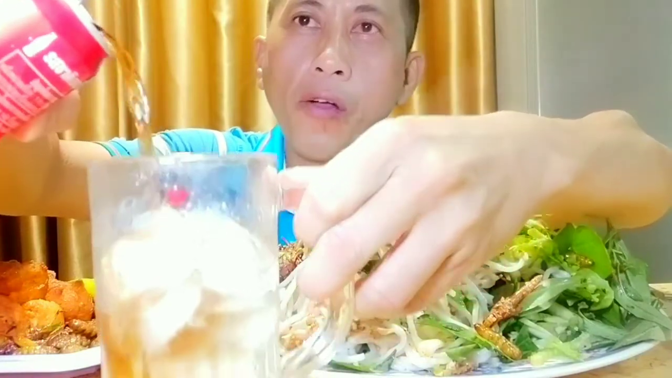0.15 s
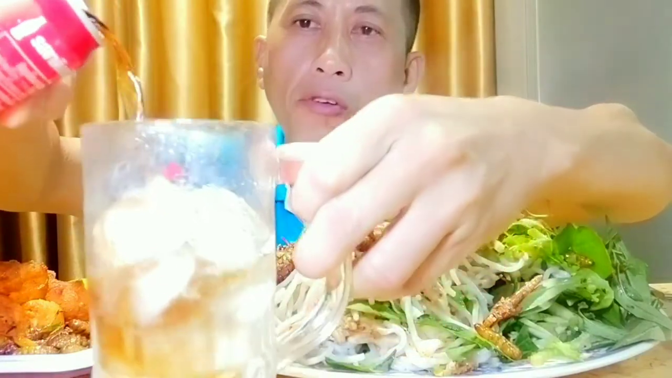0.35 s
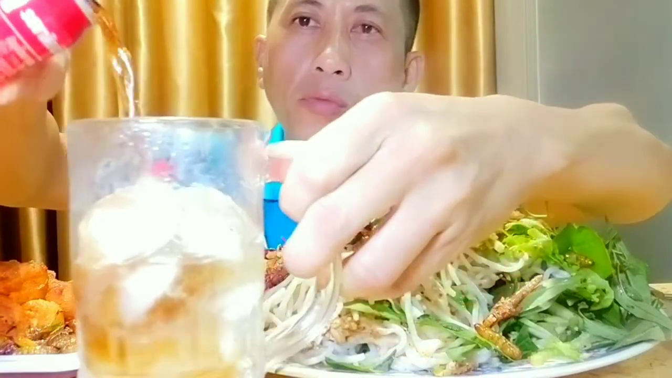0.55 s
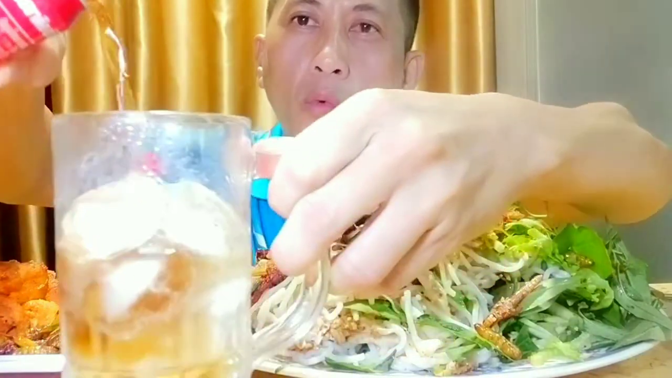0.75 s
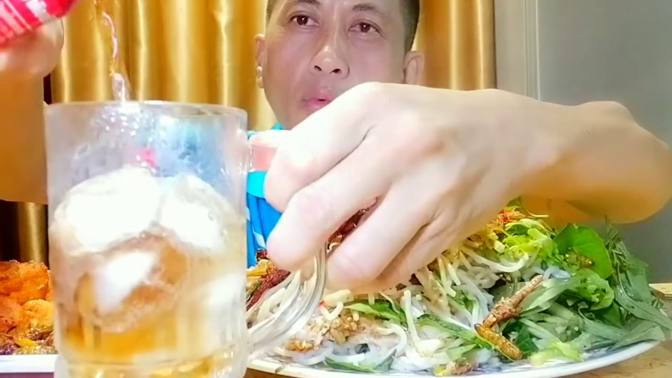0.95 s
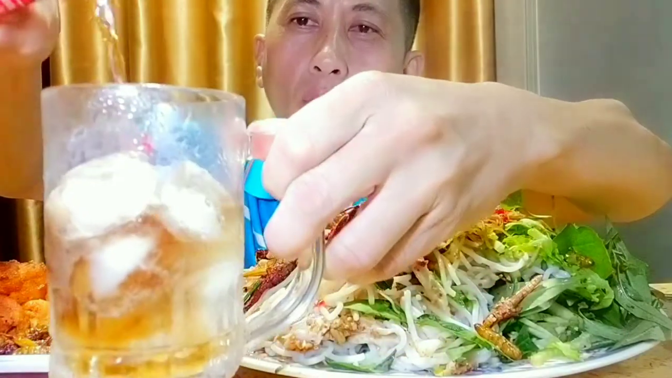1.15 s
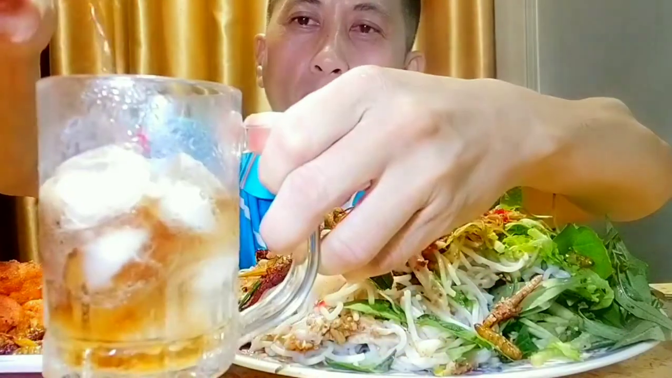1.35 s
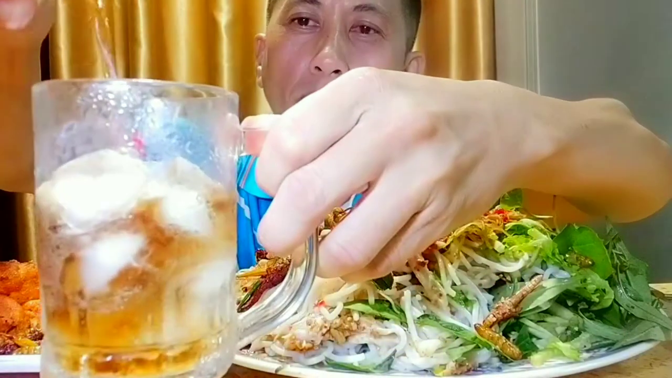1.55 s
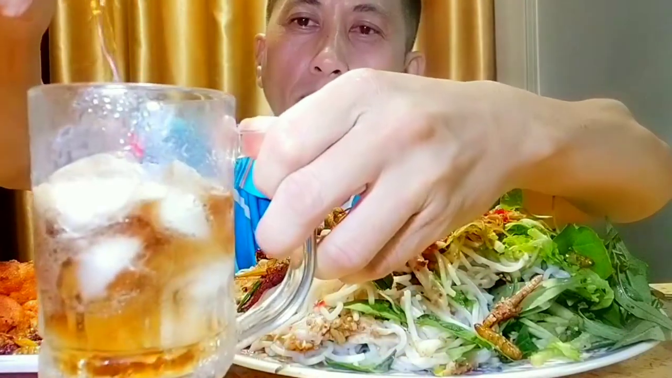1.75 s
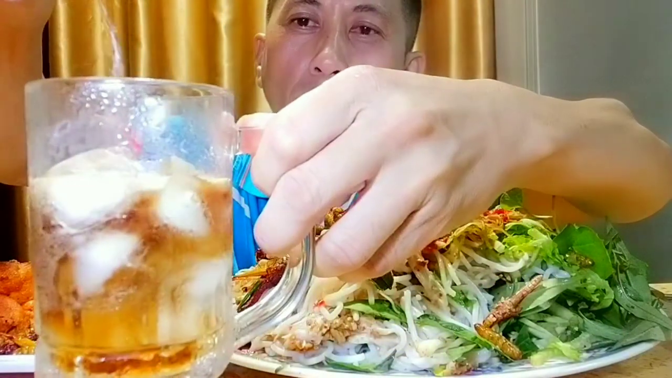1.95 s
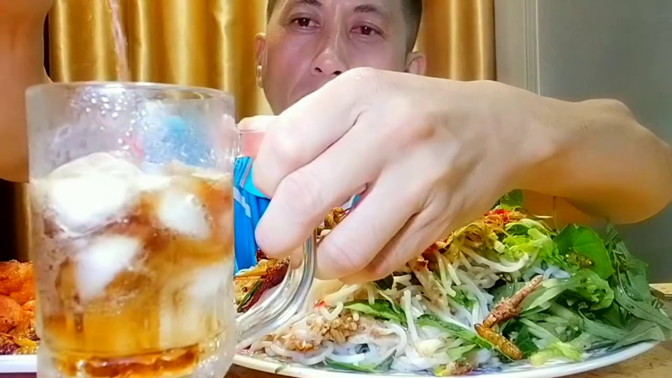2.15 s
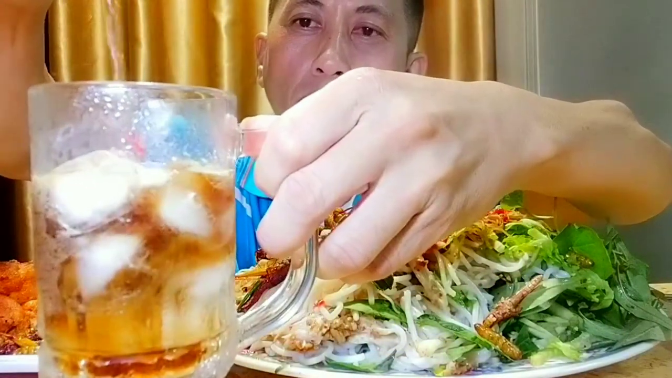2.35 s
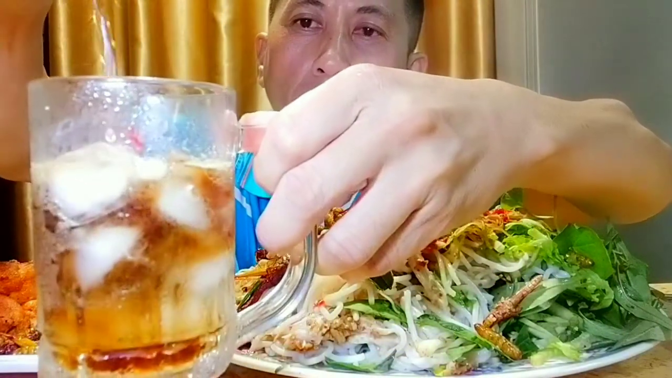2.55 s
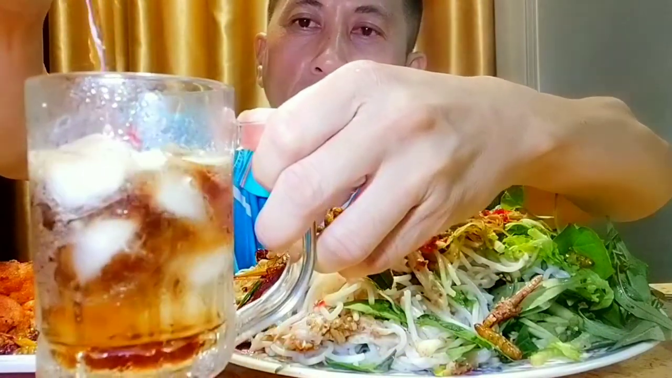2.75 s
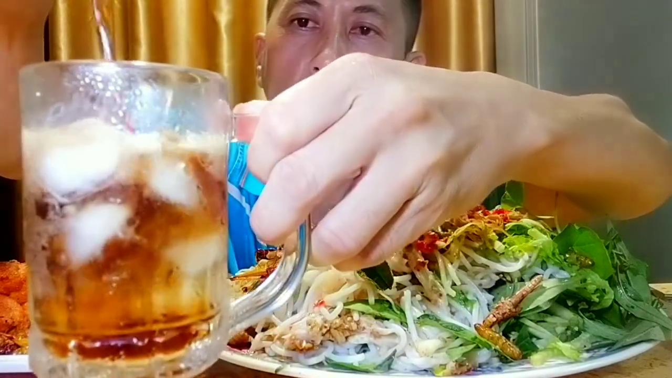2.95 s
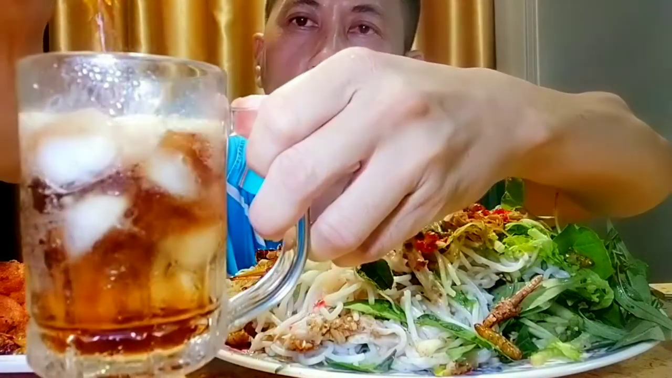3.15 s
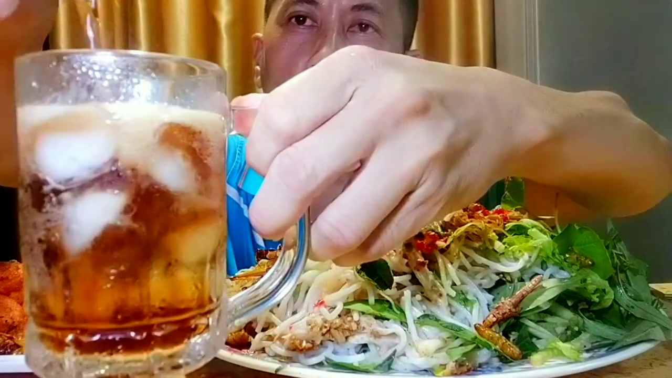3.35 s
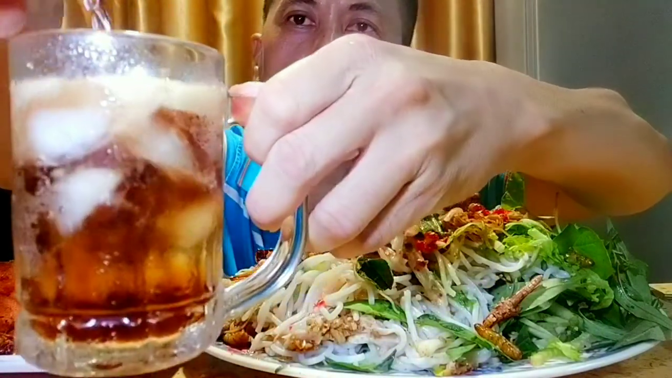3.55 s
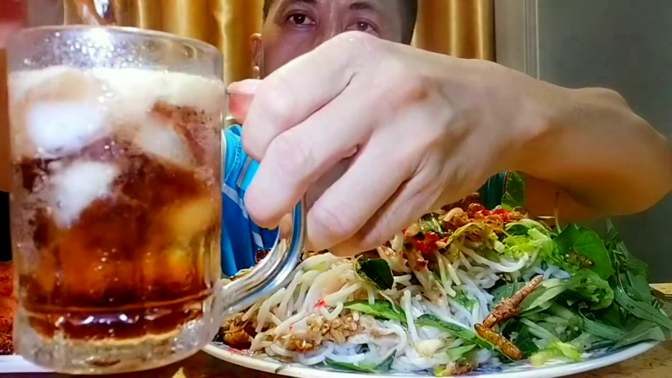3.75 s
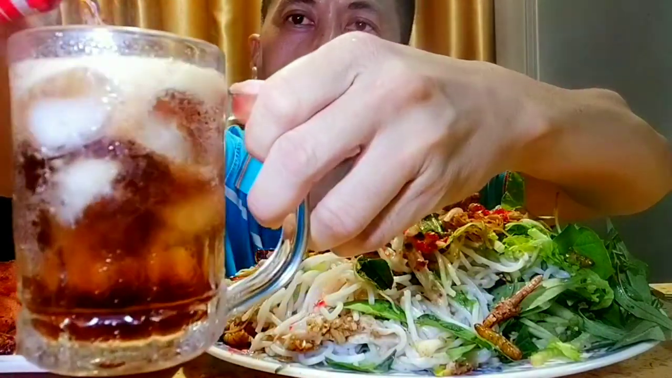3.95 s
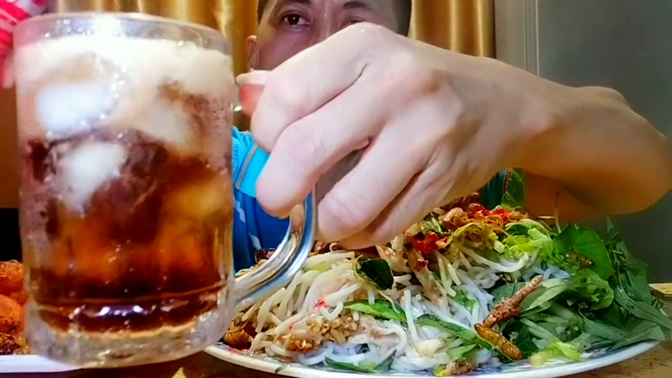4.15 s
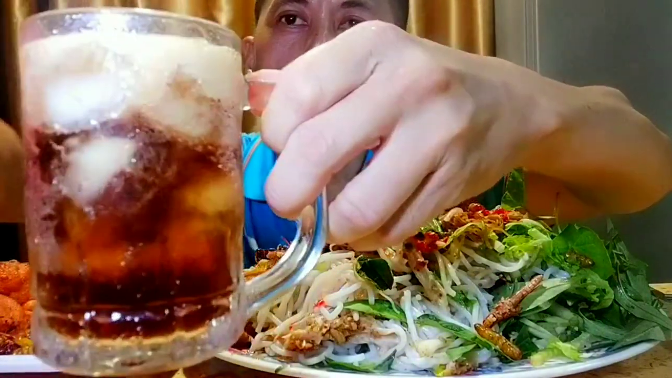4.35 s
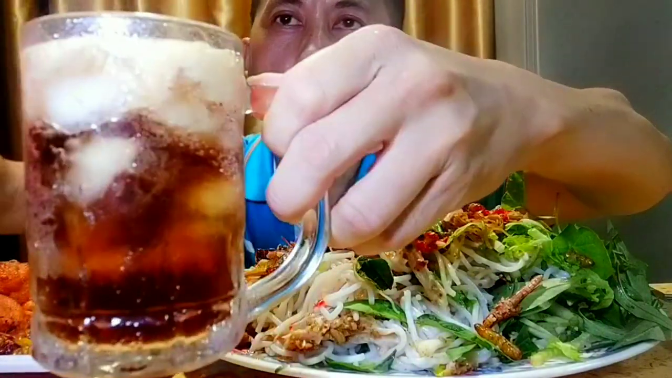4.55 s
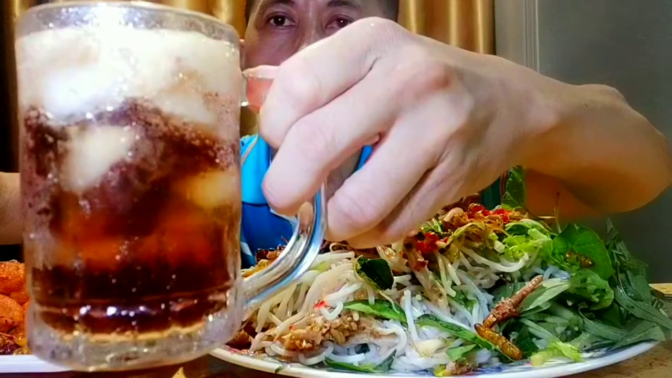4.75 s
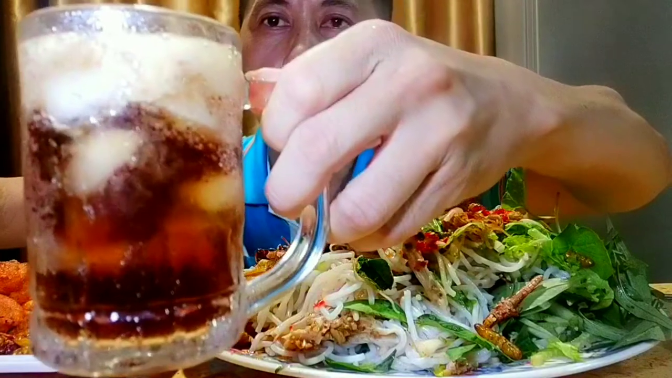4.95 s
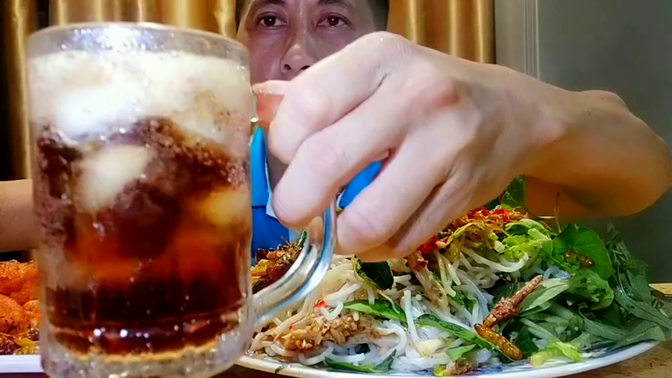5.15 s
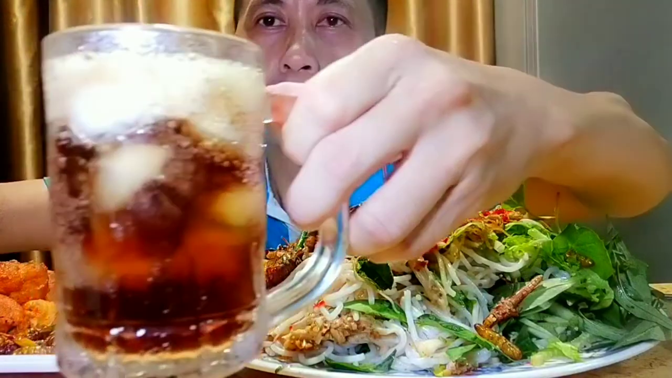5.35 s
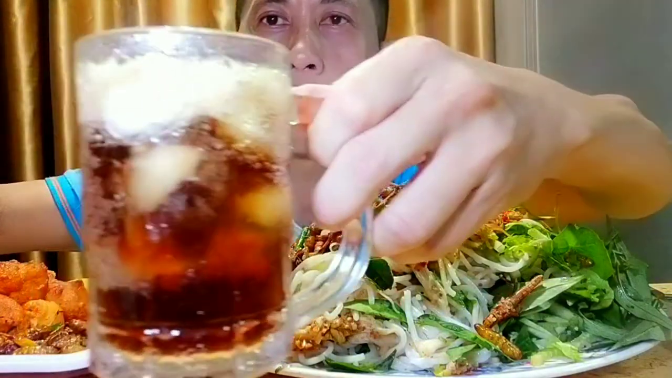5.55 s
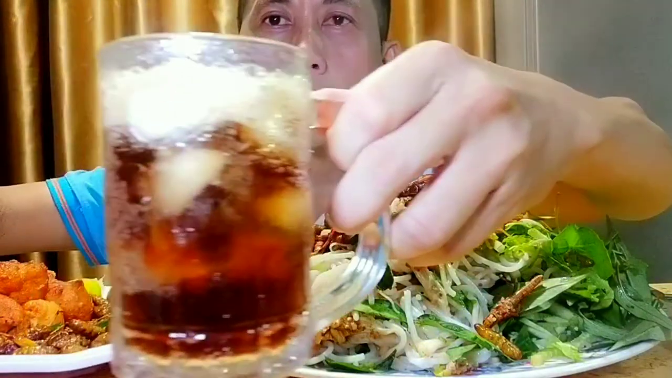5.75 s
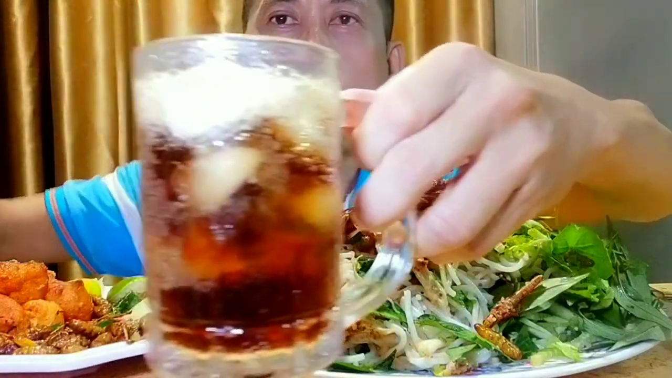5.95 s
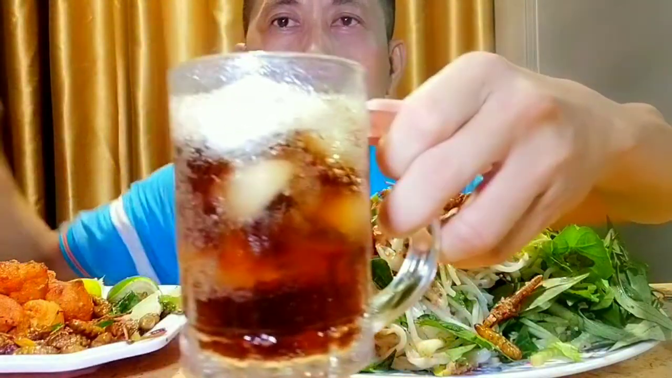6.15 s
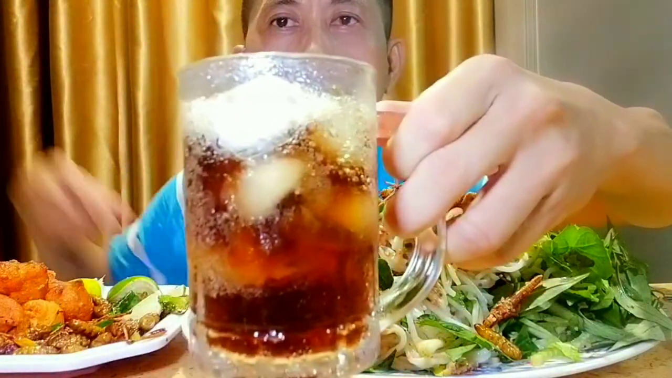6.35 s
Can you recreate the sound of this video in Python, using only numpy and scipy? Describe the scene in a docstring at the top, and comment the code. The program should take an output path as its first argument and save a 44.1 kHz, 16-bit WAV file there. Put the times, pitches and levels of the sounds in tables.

```python
"""Cola poured over ice

Close stereo in a small quiet room: ticks on ice, then fizz of random bursts filtered by a glass mug.
Bursts also ring resonators: gaps between the cubes, and the air above the drink, rising as the mug fills.
The foam builds, surges once near the end of the pour and slowly settles; larger bubbles sing as sines.
Then two knocks on the table, the second with a small rebound: decaying modes and noise."""
import sys
import numpy as np
from scipy import signal
from scipy.fft import rfft, irfft
from scipy.io import wavfile

SR = 44100
rng = np.random.default_rng(int(sys.argv[2]) if len(sys.argv) > 2 else 0)


def inscribe(sig):
    """Save sig as 16-bit PCM at rate SR to the path in sys.argv[1].

    A 1-D sig is mono; a 2-D sig holds one channel per row.
    Samples are clipped to [-1, 1] before scaling.
    """
    pcm = np.round(np.clip(np.atleast_2d(sig).T, -1, 1) * 32767)
    wavfile.write(sys.argv[1], SR, pcm.astype(np.int16))


N = 281887
TIME = np.arange(N) / SR
LN_1000 = np.log(1000)  # a 60 dB fall

# trickle becomes a full stream; stream stops; drink stops rising
POUR_START_S, POUR_END_S, FULL_S = 0.84, 4.26, 4.34


def from_db(db):
    """Decibels to gain."""
    return 10 ** (np.asarray(db) / 20)


def rms_one(x):
    """Scale to unit power."""
    return x / np.sqrt(np.mean(x ** 2) + 1e-20)


def panned(side_db):
    """Left and right gains for a left-right level difference, at constant power."""
    gains = from_db(np.array([[.5], [-.5]]) * side_db)
    return gains / np.sqrt(np.mean(gains ** 2, axis=0))


def colour(x, points, power=1, size=8192):
    """Causal minimum-phase filter that follows a spectrum, its dB scaled by power."""
    hz, db = np.transpose(points)
    grid_hz = np.maximum(np.arange(size // 2 + 1) * SR / size, 1)
    log_gain = np.log(from_db(np.interp(np.log(grid_hz), np.log(hz), db)))
    cepstrum = irfft(power * log_gain)
    # fold onto positive time: minimum phase
    cepstrum[1:size // 2] *= 2
    cepstrum[size // 2 + 1:] = 0
    impulse = irfft(np.exp(rfft(cepstrum)))
    return signal.oaconvolve(np.atleast_2d(x), impulse[None], axes=1)[:, :N]


def ring(x, hz, t60_s):
    """Two-pole resonator: a unit click sets a sine of height 1 ringing."""
    radius = 1e-3 ** (1 / (t60_s * SR))
    turn = 2 * np.pi * hz / SR
    poles = [1, -2 * radius * np.cos(turn), radius * radius]
    return signal.lfilter([0, np.sin(turn)], poles, x + 1e-18)


def struck(x, modes, cavity=False):
    """Modes driven together, each panned; cavities alternate in sign and ring twice, with steep skirts."""
    out = 0
    for k, (hz, db, t60_s, side_db) in enumerate(modes):
        tone = ring(x, hz, t60_s)
        if cavity:
            tone = (-1) ** k * rms_one(ring(tone, hz, t60_s / 2))
        out = out + from_db(db) * panned(side_db) * tone
    return out


def moving_resonance(x, hz, width_hz, size=256):
    """Band-pass whose centre glides, block by block; unit power out."""
    out, state = np.zeros_like(x), np.zeros((2, 2))
    radius = np.exp(-np.pi * width_hz / SR)
    for i in range(0, N, size):
        block = slice(i, i + size)
        poles = [1, -2 * radius * np.cos(2 * np.pi * hz[i] / SR), radius * radius]
        out[:, block], state = signal.lfilter([1, 0, -1], poles, x[:, block], zi=state)
    return rms_one(out)


def since(start_s):
    """Seconds that have passed since start_s; zero before."""
    return np.maximum(TIME - start_s, 0)


def dying(start_s, t60_s):
    """Envelope that starts at start_s and decays exponentially."""
    return (TIME >= start_s) * np.exp(-LN_1000 * np.clip((TIME - start_s) / t60_s, 0, 10))


def lump(centre_s, level_db, length_s):
    """Gaussian swell; length_s is from the centre to 1/e."""
    return from_db(level_db) * np.exp(-((TIME - centre_s) / length_s) ** 2)


def flutter(per_s, depth_db):
    """Gain that wanders at random between knots."""
    knots_s = np.arange(0, TIME[-1] + 1, 1 / per_s)
    return from_db(depth_db * np.interp(TIME, knots_s, rng.standard_normal(len(knots_s))))


def pops(per_s, spread_db, shared=0.097):
    """Random bubble bursts of uneven size; a share of the power reaches both microphones alike."""
    sizes = from_db(spread_db * np.minimum(rng.exponential(1, (3, N)), 5))
    signs = rng.choice([-1, 1], (3, N))
    clicks = rms_one(sizes * signs * (rng.random((3, N)) < per_s / SR))
    share = np.clip(shared, 0, 1)
    return np.sqrt(share) * clicks[2] + np.sqrt(1 - share) * clicks[:2]


def room(x, wet_db, t60_s, wall_hz):
    """Direct sound plus a diffuse tail, dulled by the walls and different at each ear."""
    tail = (rng.standard_normal((2, N)) * dying(0.0029, t60_s))[:, :SR]
    tail = signal.lfilter(*signal.butter(1, min(wall_hz, SR / 3), fs=SR), tail)
    tail /= np.sqrt(np.sum(tail ** 2) / 2)
    return x + from_db(wet_db) * signal.oaconvolve(x, tail, axes=1)[:, :N]


# room spectrum: pitch_hz, density_db_per_hz (relative)
ROOM_SPECTRUM = [(20, 1.5), (49, -8), (96, -4), (144, -14), (370, -14), (433, -21.5), (543, -7.5),
                 (700, -24.5), (1690, -29), (2860, -34.5), (5000, -96)]


def room_tone():
    """Faint low rush of filtered noise, mostly alike on both sides."""
    noise = rng.standard_normal(N) + 0.43 * rng.standard_normal((2, N))
    return from_db(-71.5) * rms_one(colour(noise, ROOM_SPECTRUM)) * panned(side_db=-2.0)


# soft bumps at the right microphone: centre_s, level_db, length_s
BUMP_SWELLS = [(.58, -62, .13), (.815, -57, .03), (.965, -55, .03), (1.655, -44, .014), (1.752, -50, .018),
               (1.76, -58, .07)]
# bump spectrum: pitch_hz, density_db_per_hz (relative)
BUMP_SPECTRUM = [(20, -20), (75, 2), (170, -8), (225, -33.5), (500, -50)]


def bumps():
    """Short swells of low noise, almost all on the right."""
    swell = sum(lump(*bump) for bump in BUMP_SWELLS)
    rumble = rms_one(colour(rng.standard_normal(N), BUMP_SPECTRUM))
    return swell * rumble * panned(side_db=-33.0)


# contacts with the table: start_s, thud_db, clack_db, click_db, push_low_hz, push_high_hz
KNOCK_HITS = [(5.219, -22, -40.5, -70.5, 150, 734), (5.238, -26.5, -48, -77.5, 150, 379),
              (5.4236, -20.5, -20.5, -44.5, 277, 2470), (5.441, -24, -73, -69.5, 280, 437),
              (5.5449, -38.5, -33.5, -36.5, 250, 605)]
# table top modes: pitch_hz, level_db, t60_s, left_right_db
TABLE_MODES = [(150, -16.5, 0.29, 0.5), (168.7, -16, 0.37, -2), (229, -13, 0.24, -7),
               (307, -7, 0.063, -2.5), (387.4, -11.5, 0.25, -5), (411, -16.5, 0.24, 6),
               (578, -23.5, 0.25, 4), (671.4, -3.5, 0.11, 1.5), (743, -3, 0.035, -4.5),
               (890, -5.5, 0.043, 3.5)]
# glassware modes: pitch_hz, level_db, t60_s, left_right_db
GLASS_MODES = [(1545, -21, .24, 0), (1640, -21, .2, -1), (2513, -17, .22, 7), (2633, -17, .25, 6),
               (2790, -15, .2, 8), (3150, -11, .08, 9), (3504, -10, .15, 9), (5016, -13, .12, 7)]
# clack spectrum: pitch_hz, density_db_per_hz (relative)
CLACK_SPECTRUM = [(600, -18), (1150, -5), (1600, 6.5), (2100, -3.5), (2800, 7.5), (4200, 2), (6700, 10.5),
                  (7800, -0.5), (10000, -17.5), (15500, -35)]
# ring at the point of contact: start_s, level_db, pitch_hz
CONTACT_RINGS = [(5.2188, -45.5, 1910), (5.423, -44, 1570)]


def knocks(clack_t60_s=0.052, click_t60_s=0.084, contact_t60_s=0.3, lowest_hz=125,
           rumble_db=-14.0, rumble_t60_s=0.27, lag_s=0.00025):
    """Band-limited pushes thud in the table's modes; noise clacks, and taps ring the glassware."""
    push, tap, crack, sharp, shake = np.zeros((5, N))
    for start_s, thud_db, clack_db, click_db, low_hz, high_hz in KNOCK_HITS:
        impulse = signal.unit_impulse(N, int(start_s * SR))
        band = signal.butter(2, [low_hz, high_hz], "band", fs=SR, output="sos")
        push += from_db(thud_db) * signal.sosfilt(band, impulse)
        tap += from_db(clack_db) * impulse
        crack += from_db(clack_db) * dying(start_s, clack_t60_s)
        sharp += from_db(click_db) * dying(start_s, click_t60_s)
        shake += from_db(thud_db) * dying(start_s, rumble_t60_s)
    clack = crack * rms_one(colour(rng.standard_normal((2, N)), CLACK_SPECTRUM)) * panned(side_db=0.5)
    high_pass = signal.butter(2, 7000, "high", fs=SR)
    clack += sharp * signal.lfilter(*high_pass, rng.standard_normal((2, N)))

    # the table's many weaker modes blur into a short rumble
    noise = rng.standard_normal(N) + .5 * rng.standard_normal((2, N))
    blur = signal.sosfilt(signal.butter(2, [150, 450], "band", fs=SR, output="sos"), noise)
    thud = struck(push, TABLE_MODES) + from_db(rumble_db) * shake * rms_one(blur)
    left, right = signal.sosfilt(signal.butter(4, lowest_hz, "high", fs=SR, output="sos"), thud)
    # the thud reaches the left microphone first
    thud = np.array([left, np.interp(TIME - lag_s, TIME, right)])

    contact = 0
    for start_s, level_db, hz in CONTACT_RINGS:
        tone = rms_one(ring(rng.standard_normal((2, N)), hz, t60_s=0.009))
        contact = contact + from_db(level_db) * dying(start_s, contact_t60_s) * tone
    glass = from_db(-5.0) * struck(tap, GLASS_MODES)
    return thud + contact + room(clack, wet_db=-7.0, t60_s=0.36, wall_hz=7100) + glass


# lean of each pitch: pitch_hz, lean_db (left takes 0.1 of it, right -0.41)
MUG_LEAN = [(2000, 0), (3300, -4.5), (4200, 9), (5400, -0.5), (6200, -8.5), (7100, -5), (9000, -22.5),
            (11000, -11.5), (14000, 5)]


def out_of_mug(x):
    """The way to the microphones: each pitch leans to one side."""
    left, right = x
    return np.vstack([colour(left, MUG_LEAN, power=0.1), colour(right, MUG_LEAN, power=-0.41)])


# ice ticks, sharp bubble pops and, last, dull taps as the mug is moved:
# start_s, ring_peak_db, pitch_hz, snap_db (noise before its band-pass); all before mug and room
TICK_HITS = [(0.1053, -49, 7100, -63), (0.132, -38, 7020, -55), (0.14, -44, 5600, -67),
             (0.139, -58.5, 2340, -69), (0.254, -56.5, 2930, -57), (0.672, -42.5, 5530, -59),
             (0.675, -59.5, 2740, -56), (0.7563, -48, 6360, -48.5), (0.915, -62.5, 1530, -43),
             (0.9421, -48.5, 3250, -50), (0.9665, -38.5, 5660, -43.5), (1.0228, -55.5, 1630, -49.5),
             (1.025, -39, 5800, -73), (1.593, -51.5, 2020, -50), (2.439, -40, 6900, -46),
             (3.403, -31, 6040, -62), (5.947, -49, 4540, -70), (6.193, -64, 484, -85.5),
             (6.233, -64.5, 966, -85)]
# gaps between the cubes, deepest two first: pitch_hz, level_db, t60_s (first of two rings), left_right_db
ICE_GAPS = [(3117, -25.5, 0.015, -13), (3400, -19.5, 0.0086, -19), (5104, 1.5, 0.022, 29),
            (5517, 7.5, 0.0075, 6), (6530, 9.5, 0.0067, -6), (7134, 7, 0.019, -7)]


def ice(cycles=28, swell_cycles=17.0, snap_t60_s=0.015, rattle_db=-13, rattle_t60_s=0.46):
    """Each tick is a short sine with a noise snap, and leaves bursts rattling in the gaps between cubes."""
    rings, snaps, rattle = np.zeros((3, 2, N))
    t = TIME[:SR // 2]
    for start_s, peak_db, hz, snap_db in TICK_HITS:
        start = int(start_s * SR)
        at, age = slice(start, start + len(t)), t[:N - start]
        shape = (1 - np.exp(-age * hz / swell_cycles)) * np.exp(-LN_1000 * age * hz / cycles)
        # right channel one radian ahead
        tone = np.sin(2 * np.pi * hz * age + [[0], [1]])
        rings[:, at] += from_db(peak_db) * shape / shape.max() * tone
        snaps[:, at] += from_db(snap_db) * np.exp(-LN_1000 * age / snap_t60_s)
        rattle[:, at] += from_db(snap_db + rattle_db) * np.exp(-LN_1000 * age / rattle_t60_s)
    snap_band = signal.butter(2, [3000, 12000], "band", fs=SR)
    snaps = signal.lfilter(*snap_band, snaps * rng.standard_normal((2, N)))
    rattle *= rms_one(struck(pops(2000, spread_db=3.5), ICE_GAPS, cavity=True))
    return room(out_of_mug(rings + snaps), wet_db=-5.0, t60_s=0.23, wall_hz=8850) + rattle


def ice_wet():
    """Zero until the first tick on the ice, then one."""
    return TIME > TICK_HITS[0][0]


def filled():
    """How full the mug is, 0 to 1: a steady stream raises the drink evenly."""
    return np.minimum(since(POUR_START_S) / (FULL_S - POUR_START_S), 1)


# the head's first share of its full power, and its build-up and fade
FOAM_FIRST_SHARE, FOAM_BUILD_S, FOAM_FADE_DB_PER_S = 0.0095, 2.33, 3
TRICKLE_DB, IDLE_DB = -23.5, -23  # fizz added from the first tick on; constant floor; re a full head


def foam_db():
    """Activity of the foam against a full head: it builds under the stream and fades afterwards."""
    first_share = np.clip(FOAM_FIRST_SHARE, 0, 1)
    growth = 1 - (1 - first_share) * np.exp(-since(POUR_START_S) / FOAM_BUILD_S)
    head = (TIME > POUR_START_S) * growth
    trickle = ice_wet() * from_db(TRICKLE_DB) ** 2 + from_db(IDLE_DB) ** 2
    return 10 * np.log10(head + trickle) - FOAM_FADE_DB_PER_S * since(POUR_END_S)


# bursting bubbles' spectrum: pitch_hz, density_db_per_hz (relative)
FIZZ_SPECTRUM = [(1000, -31), (2900, -18), (3600, -13.5), (4180, -4.5), (5050, -3), (5900, -8.5),
                 (6600, -4), (7250, -2), (8000, -8), (9200, -11), (9700, -20), (15000, -26)]
# narrow hollows of the bare ice: pitch_hz, level_db, t60_s (first of two rings), left_right_db
BARE_ICE_HOLLOWS = [(4730, -1, 0.033, -8), (5270, -13.5, .008, 21), (6550, 3.5, 0.023, 7),
                    (7030, -1.5, 0.014, -18), (8020, 4.5, 0.01, -3)]
WET_ICE_DB, WET_ICE_POUR_DB, WET_ICE_T60_S = -74, -65, 11  # under the trickle; at the splash; drowning
SPLASH_S, SPLASH_DB, SPLASH_T60_S = 0.668, -64, 2.1  # the stream's front spatters on the cubes


def wet_ice():
    """Bursts sizzle in the bare ice's hollows, turn to uneven splashing as the stream lands, then drown."""
    trickle = from_db(WET_ICE_DB) * ice_wet() * (TIME < SPLASH_S)
    flow = trickle + from_db(WET_ICE_POUR_DB) * dying(SPLASH_S, WET_ICE_T60_S)
    sizzle = flow * rms_one(struck(pops(1400, spread_db=6.0), BARE_ICE_HOLLOWS, cavity=True))
    splash = rms_one(colour(pops(2200, spread_db=3.0), FIZZ_SPECTRUM))
    spatter = from_db(SPLASH_DB) * dying(SPLASH_S, SPLASH_T60_S) * splash
    return sizzle + spatter * flutter(per_s=45.2, depth_db=4.0)


AIR_EMPTY_HZ, AIR_FULL_HZ = 1700, 2297


def air_hz():
    """Pitch of the air above the drink: the wavelength shortens with the air column."""
    return 1 / ((1 - filled()) / AIR_EMPTY_HZ + filled() / AIR_FULL_HZ)


# the stream gurgles in the air: centre_s, level_db, length_s, left_right_db
GURGLE_SWELLS = [(1.963, -58.5, 0.2, 18), (3.238, -65.5, 0.25, 15), (4.09, -67, 0.15, 5)]
AIR_DB, AIR_FOLLOWS = -65, 2.33  # under a full head; dB per dB of foam
AIR_POURING_SIDE_DB, AIR_RESTING_SIDE_DB = 10, -3  # left-right
# the stream reaches the gaps, which ring until flooded at this share of the filling
GAPS_START_S, GAPS_ATTACK_S, GAPS_FLOODED_SHARE = 1, 0.25, 1
GAPS_DB, GAPS_DEEP_DB = -56, -9  # wetted and open; the two deepest against the rest


def hollows(spread=0.12, closing=0.37, blip_db=-6):
    """Bursts ring the shrinking air space above the drink and the gaps between the cubes."""
    hz = air_hz()
    # fine bursts, with a few big ones as blips
    gurgle = pops(880, spread_db=1.5, shared=0.63)
    gurgle = gurgle + from_db(blip_db) * pops(21, spread_db=-9.5, shared=0.1)
    gurgle *= flutter(per_s=49, depth_db=2.0)
    # two close resonances make one steep band; they draw together as the mug fills
    split = spread * (1 - closing * filled())
    air = moving_resonance(gurgle, hz * (1 - split), width_hz=75)
    air = moving_resonance(air, hz * (1 + split), width_hz=75)
    air = moving_resonance(air, hz, width_hz=2200)
    turn_s = [POUR_END_S - .5, POUR_END_S + .5]
    side_db = np.interp(TIME, turn_s, [AIR_POURING_SIDE_DB, AIR_RESTING_SIDE_DB])
    air_gain = from_db(AIR_DB + AIR_FOLLOWS * foam_db()) * panned(side_db)
    for centre_s, level_db, length_s, gurgle_side_db in GURGLE_SWELLS:
        air_gain = air_gain + lump(centre_s, level_db, length_s) * panned(gurgle_side_db)

    deep = rms_one(struck(pops(1900, spread_db=-4.5), ICE_GAPS[:2], cavity=True))
    deep = deep * flutter(per_s=30, depth_db=4.0)
    shallow = rms_one(struck(pops(2700, spread_db=3.0), ICE_GAPS[2:], cavity=True))
    wetted = 1 - np.exp(-since(GAPS_START_S) / GAPS_ATTACK_S)
    still_open = np.maximum(1 - filled() / GAPS_FLOODED_SHARE, 0)
    gaps_gain = from_db(GAPS_DB) * wetted * np.sqrt(still_open)
    # the deepest gaps fade faster
    gaps = shallow + from_db(GAPS_DEEP_DB) * still_open * deep
    return air_gain * air + gaps_gain * gaps


AIR_RESTING_HZ, AIR_RESTING_WIDTH_HZ, AIR_RESTING_DB = 2579, 74, -67  # width of each of two passes


def resting_air():
    """Bursts ring the sliver of air over the full mug; pitch and strength waver as the foam shifts."""
    hz = AIR_RESTING_HZ * flutter(per_s=8, depth_db=0.2)
    bursts = pops(220, spread_db=1.5) * flutter(per_s=14, depth_db=2.5)
    tone = moving_resonance(bursts, hz, AIR_RESTING_WIDTH_HZ)
    tone = moving_resonance(tone, hz, AIR_RESTING_WIDTH_HZ)
    return from_db(AIR_RESTING_DB + foam_db()) * filled() ** 6 * tone


# largest bubbles trapped by the stream: start_s, level_db (before the swell), pitch_hz
LARGE_PLOPS = [(1.374, -58, 1630), (1.8605, -60, 2000), (2.3951, -50.5, 1694), (3.68, -44, 2110)]
PLOP_DB, PLOP_RISE_PER_S = -53.5, 1.0  # smaller ones under a full head, before swell; relative pitch rise


def plops(spread_db=4.5, pitch_spread=0.0943, cycles=70, sway_db=4, side_db=8, count=110):
    """Trapped bubbles sing as decaying sines that rise; the smaller ones scatter about the air's pitch."""
    out, pitch_hz, head_db = np.zeros((2, N)), air_hz(), foam_db()
    age = TIME[:SR // 8]
    small = []
    for start_s in rng.uniform(POUR_START_S, POUR_END_S, count):
        i = int(start_s * SR)
        level_db = PLOP_DB + 2 * head_db[i] + spread_db * rng.normal()
        small.append((start_s, level_db, pitch_hz[i] * np.exp(pitch_spread * rng.normal())))
    for start_s, level_db, hz in LARGE_PLOPS + small:
        i = int(start_s * SR)
        turns = hz * age * (1 + PLOP_RISE_PER_S * age / 2)
        shape = (1 - np.exp(-turns / 4)) * np.exp(-LN_1000 * turns / cycles)
        gains = from_db(level_db) * panned(side_db + sway_db * rng.normal())
        out[:, i:i + len(age)] += gains * shape * np.sin(2 * np.pi * turns)
    return out


# waves of the surge of foam: start_s, level_db, t60_s
SURGE_WAVES = [(3.388, -40, 0.85), (3.545, -48.5, 0.34)]
# surge spectrum: pitch_hz, density_db_per_hz (relative)
SURGE_SPECTRUM = [(800, -39), (1150, -30), (1380, -8), (1700, -12.5), (2230, -2.5), (2650, -4.5),
                  (3000, -12.5), (4400, -12), (5100, -18), (6100, -9), (7200, -18.5), (8000, -25.5),
                  (15000, -28.5)]
SURGE_ATTACK_S, SURGE_HOLD_S = 0.018, 0.033  # decay starts SURGE_HOLD_S after the wave's start


def surge(ring_hz=2226, ring_t60_s=0.11, ring_db=-8):
    """A gush of bursts froths up at once and dies down in two waves; the mug sings along faintly."""
    froth = rms_one(colour(pops(2400, spread_db=2.5), SURGE_SPECTRUM)) * flutter(per_s=70, depth_db=1.8)
    singing = from_db(ring_db) * rms_one(ring(froth, ring_hz, ring_t60_s))
    waves = []
    for start_s, level_db, t60_s in SURGE_WAVES:
        attack = np.minimum(since(start_s) / SURGE_ATTACK_S, 1)
        decay = np.exp(-LN_1000 * since(start_s + SURGE_HOLD_S) / t60_s)
        waves.append(from_db(level_db) * attack * decay)
    # the waves add in power
    return np.linalg.norm(waves, axis=0) * (froth + singing) * panned(side_db=0.5)


# mug's peaks and dark bands on the fizz: pitch_hz, left_db, right_db
FULL_MUG_BANDS = [(5580, -7.5, 0), (5530, 3, 4.5), (6120, 10, 2.5), (7420, -9, -5), (8960, -12, -6.5),
                  (9640, -22, -4)]
# the same once the mug is drawn back: pitch_hz, left_db, right_db
DRAWN_BACK_BANDS = [(5470, 8.5, 4), (6270, 1.5, -12), (6810, 5, 9), (7480, -10, -10), (8400, -48, 3)]
DRAW_BACK_S, DRAW_BACK_END_S = 5.62, 6


def mug_bands(x, bands, width_hz=340):
    """Chain of peaking filters, with its own heights on each side."""
    out, half = x.copy(), np.tan(np.pi * width_hz / SR)
    for hz, *sides_db in bands:
        turn = -2 * np.cos(2 * np.pi * hz / SR)
        for k, db in enumerate(sides_db):
            height = from_db(db / 2)
            zeros = [1 + half * height, turn, 1 - half * height]
            poles = [1 + half / height, turn, 1 - half / height]
            out[k] = signal.lfilter(zeros, poles, out[k])
    return out


def mug_colour(x, first_share=0.054):
    """The mug's bands deepen as it fills, and change as it is drawn back."""
    depth = np.clip(first_share + filled(), 0, 1)
    back = np.interp(TIME, [DRAW_BACK_S, DRAW_BACK_END_S], [0, 1])
    near = (1 - depth) * x + depth * mug_bands(x, FULL_MUG_BANDS)
    return (1 - back) * near + back * mug_bands(x, DRAWN_BACK_BANDS, width_hz=550)


# under a full head, before foam()'s final 2 dB; spray's share of the foam's dB swing
FIZZ_DB, SPRAY_DB, SPRAY_FOLLOWS = -58, -62, 0.48


def bubbles(per_s=130, cycles=55, level_db=-8, spread_db=2.0, count=36):
    """Larger bubbles sing briefly above the fizz, each dealt one of a row of pitches at random."""
    sizes = from_db(spread_db * np.minimum(rng.exponential(1, (2, N)), 4))
    born = sizes * rng.choice([-1, 1], (2, N)) * (rng.random((2, N)) < per_s / SR)
    dealt = rng.integers(0, count, (2, N))
    rings = 0
    for k, hz in enumerate(np.geomspace(4300, 9000, count)):
        # the second resonator makes each ring swell before it dies
        tone = ring(born * (dealt == k), hz, cycles / hz)
        rings = rings + ring(tone, hz, cycles / hz / 4)
    return out_of_mug(from_db(FIZZ_DB + foam_db() + level_db) * rms_one(rings))


DIP_START_HZ, DIP_END_HZ, DIP_SINK_S = 4320, 3415, 0.81


def sinking_dip(x, width_hz=800, size=512):
    """Notch that glides down once the stream runs, block by block."""
    sunk = np.exp(-(since(POUR_START_S) / DIP_SINK_S) ** 2)
    hz = DIP_END_HZ + (DIP_START_HZ - DIP_END_HZ) * sunk
    out, state = np.zeros_like(x), np.zeros((2, 2))
    for i in range(0, N, size):
        block = slice(i, i + size)
        notch = signal.iirnotch(hz[i], hz[i] / width_hz, fs=SR)
        out[:, block], state = signal.lfilter(*notch, x[:, block], zi=state)
    return out


# finer spray's spectrum: pitch_hz, density_db_per_hz (relative)
SPRAY_SPECTRUM = [(7000, -7.5), (9800, -5.5), (12500, 1), (13700, 7.5), (15500, 4)]


def foam():
    """Filtered random bursts, sparse at first, thousands a second later, with a finer spray on top."""
    head_db = foam_db()
    per_s = 7000 * from_db(head_db)
    # cancels the level change that the burst rate brings
    even = np.sqrt(per_s.mean() / per_s)
    fizz = rms_one(colour(pops(per_s, spread_db=1.5), FIZZ_SPECTRUM))
    fizz = from_db(FIZZ_DB + head_db) * even * fizz
    spray = rms_one(colour(pops(11000, spread_db=2.5, shared=0.036), SPRAY_SPECTRUM))
    spray = from_db(SPRAY_DB + SPRAY_FOLLOWS * head_db) * spray
    return out_of_mug(sinking_dip(fizz + spray)) * flutter(per_s=27, depth_db=1.23) * from_db(2.0)


def scene():
    """The room, the table and the mug."""
    drink = mug_colour(foam() + bubbles()) + wet_ice() + plops() + hollows() + resting_air() + surge() + ice()
    return room_tone() + bumps() + knocks() + drink


CUTOFF_HZ = 15650


def record(dry):
    """Steep elliptic low-pass cuts the top."""
    return signal.sosfilt(signal.ellip(12, .1, 70, CUTOFF_HZ, fs=SR, output="sos"), dry)


dry = scene()
out = record(dry)
inscribe(out)
```